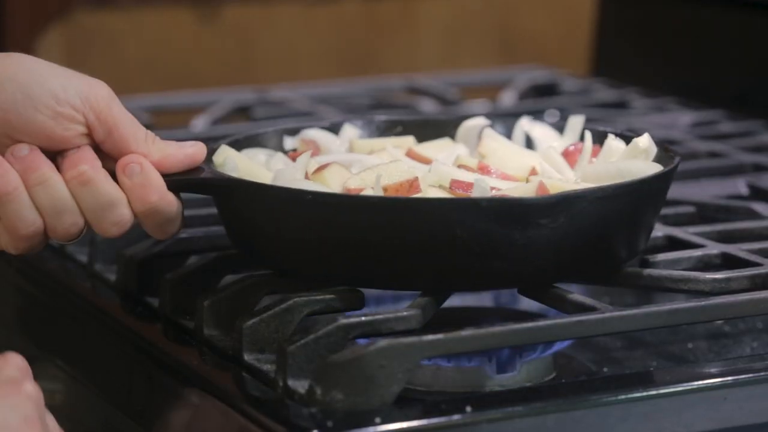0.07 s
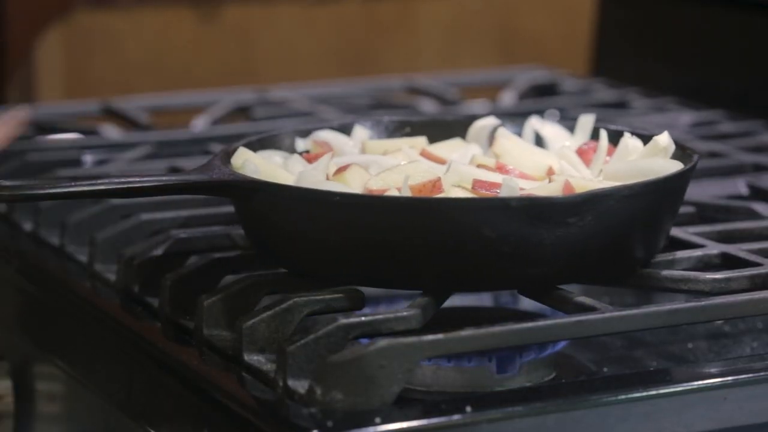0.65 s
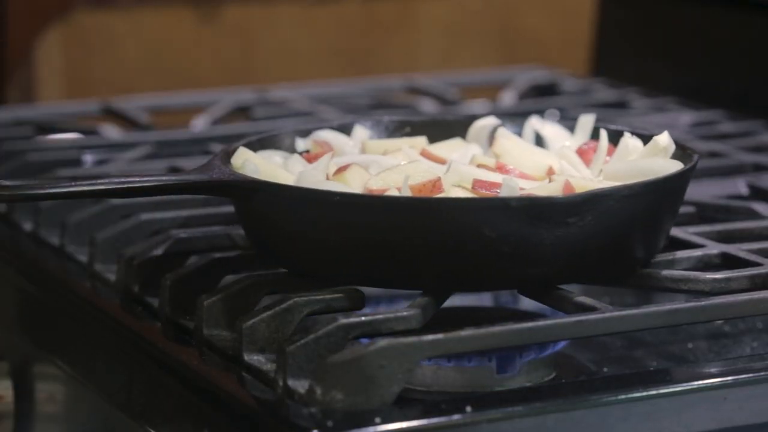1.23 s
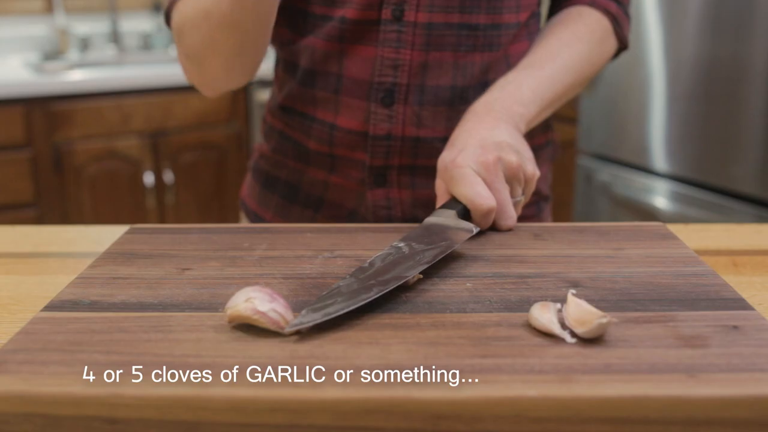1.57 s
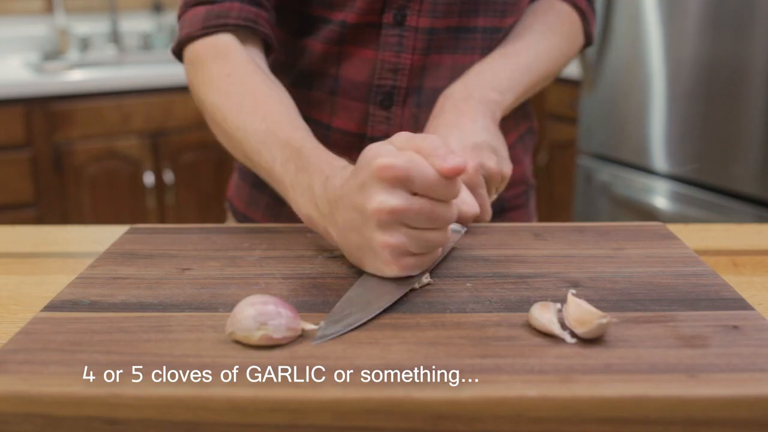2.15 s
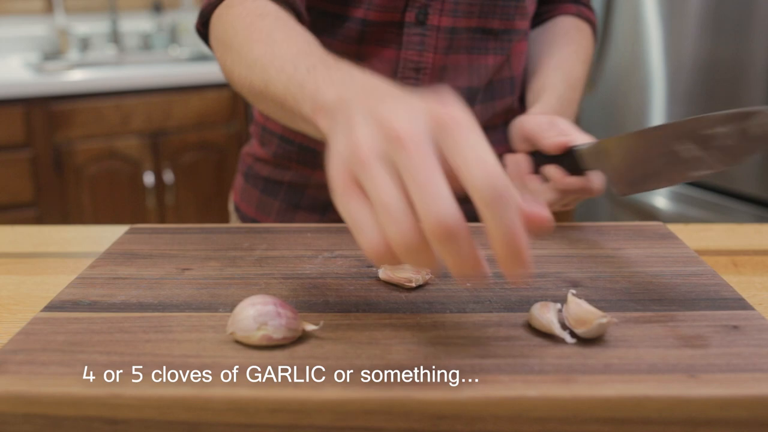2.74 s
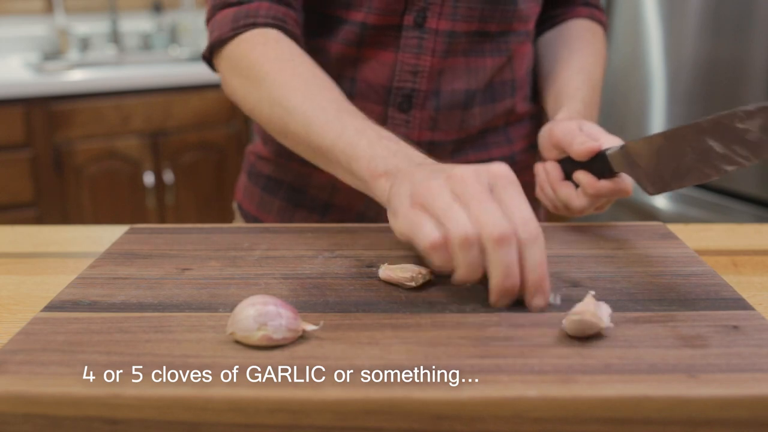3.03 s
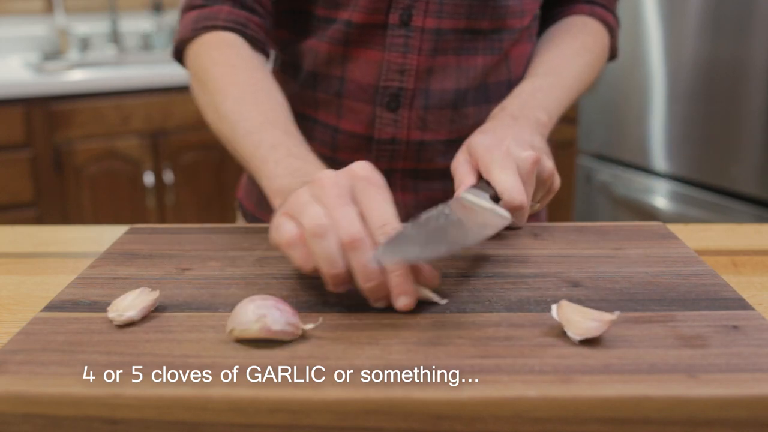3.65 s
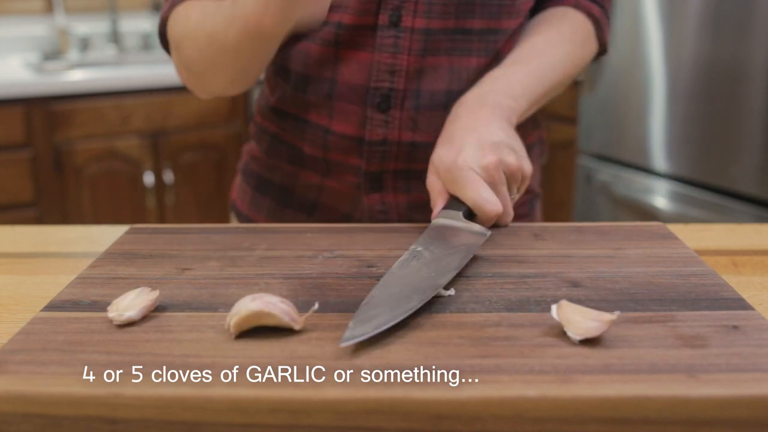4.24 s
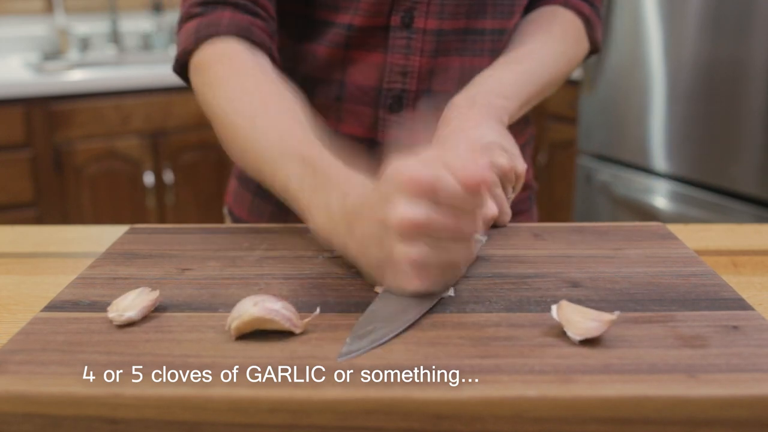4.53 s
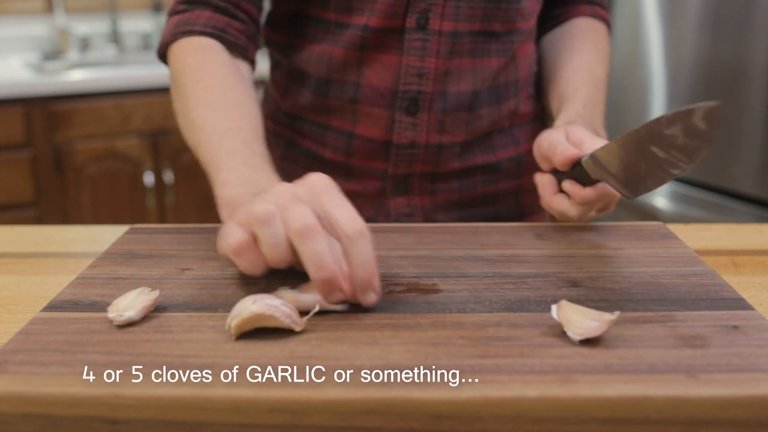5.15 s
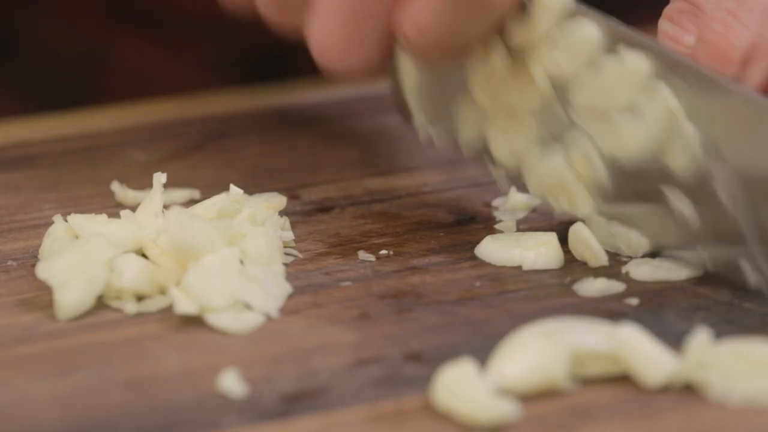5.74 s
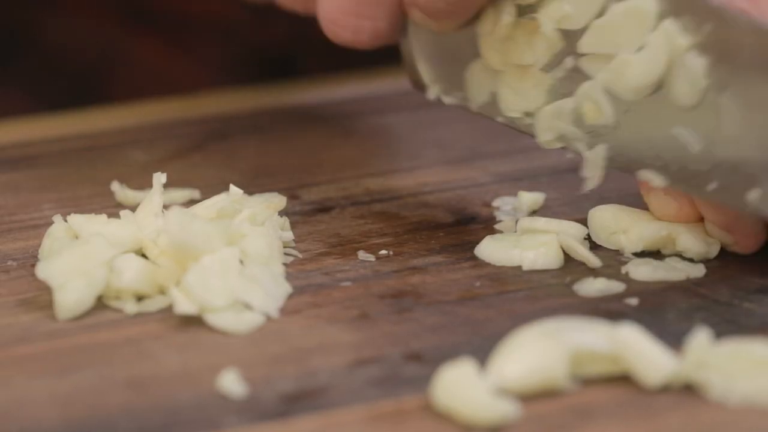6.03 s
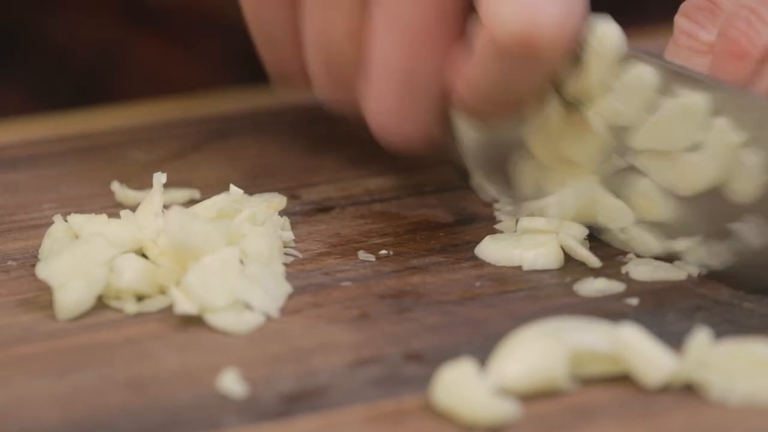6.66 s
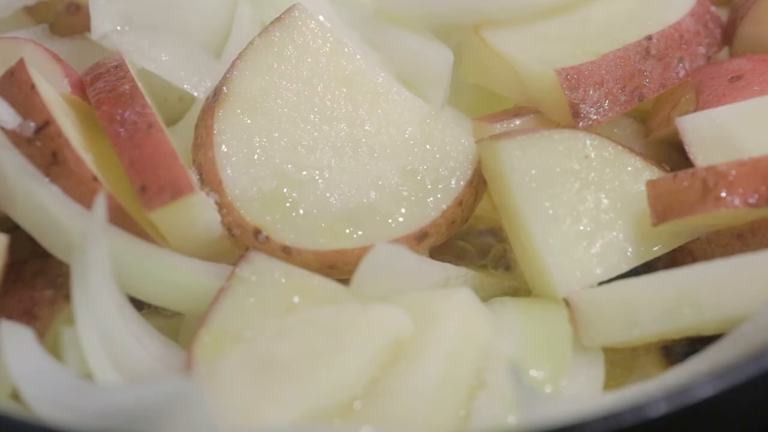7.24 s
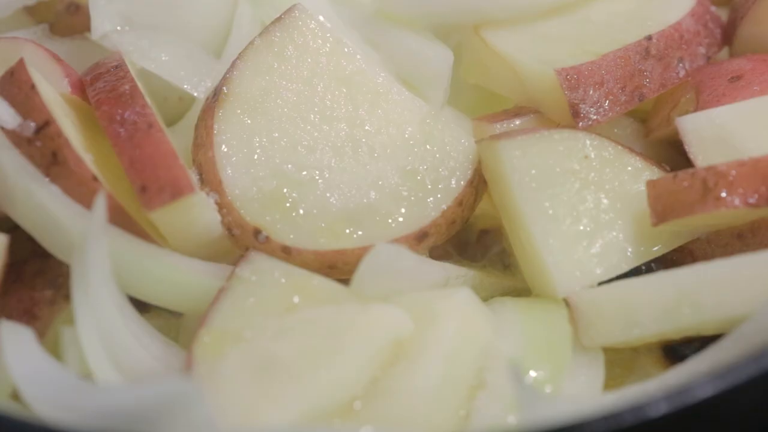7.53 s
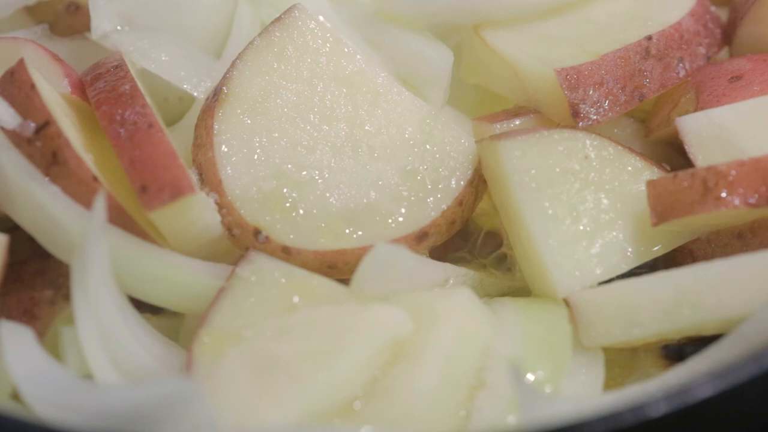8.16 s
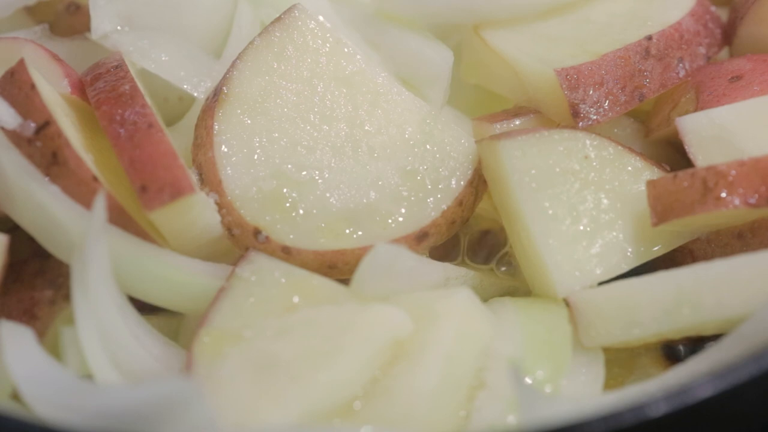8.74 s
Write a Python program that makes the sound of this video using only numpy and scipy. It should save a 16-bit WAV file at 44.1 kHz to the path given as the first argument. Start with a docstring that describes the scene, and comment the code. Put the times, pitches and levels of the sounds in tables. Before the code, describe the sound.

Two loud, cracking garlic smashes on a wooden board and four softer knife cuts, between a brief iron pan scrape and gently popping oil.

```python
"""An iron pan grinds onto a stove grate, catching and slipping, then sizzles faintly across a kitchen.
At the wooden board a fist twice smashes garlic under a knife blade: the clove cracks, the steel rings
and the counter shudders. Papery skins are brushed aside, and the knife slices four times into the wood.
Then the pan is close to the microphone, spitting as steam bubbles burst in the oil.
Mono, in a fairly live room that answers every blow."""
import sys
import numpy as np
from scipy import signal
from scipy.fft import rfft, irfft, next_fast_len
from scipy.io import wavfile

SR = 44100
rng = np.random.default_rng(int(sys.argv[2]) if len(sys.argv) > 2 else 0)


def to_wav(s):
    """Save 16-bit WAV."""
    ch = np.atleast_2d(s).T  # columns
    pcm = np.round(np.clip(ch, -1, 1) * 32767)  # PCM
    wavfile.write(sys.argv[1], SR, pcm.astype(np.int16))


N = 396459
TIME = np.arange(N) / SR

# The wooden board's modes. Each row: pitch in Hz, relative level in dB, t60 in seconds.
BOARD = [(183.5, -12.5, 0.047), (260, -10, 0.062), (305, -47.5, 0.017), (491, -20, 0.041),
         (563, -18, 0.038), (810, -10, 0.022), (963, -13, 0.055), (1087, -27, 0.11), (1415, -44, 0.021),
         (1620, -8, 0.0079), (2010, -29, 0.024), (2760, -9.5, 0.015)]
# The wood is knocked, by a hand or by the knife laid down. Each row: start in seconds, drive in dB, lowest and
# highest pitch driven in Hz.
BUMPS = [(1.485, -32.5, 118, 210), (4.058, -23, 70, 184), (4.477, -34.5, 400, 1200)]
# The fist lands on the blade. Each row: start in seconds, crack in dB, its pitch in Hz, thump in dB,
# clap in dB, top of the steel's slap in Hz, after-ring in dB, its pitch in Hz. Levels are relative.
SMASHES = [(2.185, 0, 2180, -5.5, -12.5, 3020, -2, 2940), (4.629, 1, 4100, -9, -11.5, 3720, -19.5, 1704)]
# The edge goes through a clove into the board. Each row: time in seconds, drive of the knock in dB,
# its highest pitch in Hz, relative level of the juice's hiss in dB.
SLICES = [(5.3995, -22, 1450, -47.5), (5.8635, -15.5, 1500, -46), (6.292, -13.5, 1610, -38.5),
          (6.7278, -18, 1550, -42)]
LAND_S = .0062  # from the fist's first touch until the blade reaches the board


def amp(db):
    """Decibels to gain."""
    return 10 ** (np.asarray(db) / 20)


def unit(x):
    """Scale to an rms of one."""
    return x / np.std(x)


def fader(rows):
    """Gain over time from (s, dB) rows."""
    return amp(np.interp(TIME, *np.transpose(rows)))


def fade_in(s, length_s=.18):
    """Gain rising from nothing to one around a time."""
    return np.clip(.5 + (TIME - s) / length_s, 0, 1)


def stroke(s, db, rise_s, fall_s):
    """Gain of a sliding movement that speeds up to a time and then dies away."""
    return amp(db) * np.exp(-(np.maximum(s - TIME, 0) / rise_s) ** 2 - np.maximum(TIME - s, 0) / fall_s)


def add(track, s, x):
    """Mix a sound into a track at a time."""
    i = max(0, int(s * SR))
    track[i:i + len(x)] += x[:N - i]


def colour(x, points):
    """Give a sound a spectrum of (Hz, dB) points, falling off steeply below the first."""
    hz, db = np.transpose(points)
    size = next_fast_len(len(x))
    f = np.maximum(np.fft.rfftfreq(size, 1 / SR), 1)
    gain = amp(np.interp(np.log(f), np.log(hz), db)) * np.minimum(f / hz[0], 1) ** 2
    return irfft(rfft(x, size) * gain, size)[:len(x)]


def resonate(x, hz, q):
    """One resonance, gain one at its centre."""
    hz = min(hz, .4 * SR)
    return signal.lfilter(*signal.iirpeak(hz, max(q, 3 * hz / SR), fs=SR), x)


def soften(x, hz, order=3):
    """Roll off the treble, as a soft contact does."""
    return signal.sosfilt(signal.butter(order, min(hz, SR / 2 - 1), fs=SR, output="sos"), x)


def clicks(rate, spread_db):
    """Random impulses of uneven size, about `rate` a second."""
    size = amp(spread_db * np.minimum(rng.exponential(size=N), 5))
    return (rng.random(N) < rate / SR) * size * rng.choice([-1, 1], N)


def crackle(rate, spread_db, q, flicker_db):
    """Tiny bursts of every pitch, more of them in the treble; each band's level flickers."""
    out = np.zeros(N)
    for hz in np.geomspace(400, 15000, 14):
        flicker = np.interp(TIME, np.linspace(0, TIME[-1], 200), rng.standard_normal(200))
        impulses = clicks(rate * (hz / 3000) ** .7, spread_db)
        grains = resonate(resonate(impulses, hz, q), hz, q)
        out += np.sqrt(hz) * unit(grains) * amp(flicker_db * flicker)
    return unit(out)


def ring(modes):
    """The free ringing of a body's (Hz, dB, t60) modes."""
    t = TIME[:SR]
    return sum(amp(db - 60 * t / t60) * np.cos(2 * np.pi * hz * t) for hz, db, t60 in modes)


def strike(hits, modes, grain_db=-60):
    """Each blow rings the same modes and a wash of lesser ones; the contact sets the range driven."""
    # The wash of dense lesser modes, as in wood. Each row: frequency in Hz, relative level in dB.
    wood_grain = [(200, 6.5), (400, -3), (650, -0.5), (1300, -0.5), (1800, -19), (3000, -3.5),
                  (6000, -31.5)]
    out, body = np.zeros(N), ring(modes)
    for s, db, low_hz, high_hz in hits:
        wash = amp(grain_db) * unit(colour(rng.standard_normal(SR), wood_grain))
        wash *= np.exp(-TIME[:SR] / .0082)
        contact = signal.butter(2, [low_hz, max(high_hz, 1.05 * low_hz)], "band", fs=SR, output="sos")
        add(out, s, amp(db) * signal.sosfilt(contact, body + wash))
    return out


def bounced(hits, delay_s=.022, drop_db=-2.5):
    """A touch lands twice: each (s, dB, lowest Hz, highest Hz) contact is followed by a weaker one."""
    return hits + [(s + delay_s, db + drop_db, low, high) for s, db, low, high in hits]


def fractures(rows, q, splinter_db):
    """Sudden breaks (s, dB, decay s, Hz): a dying rush through one resonance, with bright splinters."""
    t, out = TIME[:SR // 10], np.zeros(N)
    for s, db, decay, hz in rows:
        fade = np.exp(-t / decay)
        rush = rng.standard_normal(len(t)) * fade
        splinters = unit(rush - soften(rush, 1100, order=1))
        crack = unit(resonate(rush, hz, q)) + amp(splinter_db) * splinters
        add(out, s, .5 * amp(db) * unit(crack) * np.std(fade))
    return out


def pan_on_grate():
    """Rough iron catches and slips; the little impacts ring the pan, which then knocks into place."""
    # Pushes over the grate. Each row: start in seconds, relative level in dB, length in seconds,
    # treble roll-off in Hz.
    shoves = [(0.0, -26, 0.021, 3500), (0.018, -30, 0.094, 2900), (0.112, -30, 0.02, 9000),
              (0.13, -34.5, 0.065, 4000), (0.451, -42, 0.069, 2600)]
    # Cast iron, damped by the food. Each row: pitch in Hz, relative level in dB, t60 in seconds.
    iron = [(769, -15, 0.28), (1030, -16, 0.26), (1200, -8.5, 0.13), (1367, -13, 0.068),
            (1534, -15.5, 0.088), (1610, -21.5, 0.071), (1952, -12, 0.075), (2500, -4, 0.089),
            (2930, -2, 0.092), (3640, -8.5, 0.034), (5940, -9, 0.14)]
    # The tone of the grinding. Each row: frequency in Hz, relative level in dB.
    grind = [(41, -22), (70, -1), (210, -7.5), (322, -3.5), (632, -7.5), (1130, -2), (1660, -6.5),
             (1940, -1), (3730, -9), (4770, -12.5), (15000, -34.5)]
    # The pan settles. Each row: start in seconds, drive in dB, lowest and highest pitch driven in Hz.
    pan_knocks = [(.026, -18.5, 690, 1370), (.115, -12, 1840, 2090), (.1165, -17.5, 3380, 4030),
                  (.461, -19, 1534, 1700), (.471, -15, 1466, 1670), (.487, -27, 1480, 1740)]
    out = np.zeros(N)
    grit = clicks(rate=2500, spread_db=-.5)[:SR]
    ringing = unit(signal.fftconvolve(grit, ring(iron))[:SR])
    scrape = unit(unit(colour(grit, grind)) + amp(-10.5) * ringing)
    for s, db, length, hz in shoves:
        age = np.maximum(TIME[:SR] - s, 0) / length
        push = np.minimum(age / .041, 1) * np.exp(-age ** 2)
        add(out, 0, amp(db) * soften(scrape * push, hz, order=1))
    return out + strike(pan_knocks, iron)


def kitchen(x):
    """Diffuse reflections reach the microphone after a short gap and die faster in the treble."""
    # The room's reverberation. Each row: band centre in Hz, t60 in seconds, relative level in dB.
    room = [(60, 0.79, 5), (152, 0.6, -6), (276, 0.68, -1), (594, 0.83, 1), (1150, 0.8, -1),
            (2050, 0.94, -8), (3980, 0.74, -10.5), (7500, 0.52, -14.5), (13900, .38, -24.5)]
    t, tail = TIME[:int(1.5 * SR)], 0
    noise = rfft(rng.standard_normal(len(t)))
    pitch = np.log(np.maximum(np.fft.rfftfreq(len(t), 1 / SR), 1))
    centres = np.log([row[0] for row in room])
    for band, (_, t60, db) in zip(np.eye(len(room)), room):
        fade = np.clip((t - .005) / .00252, 0, 1) * np.exp(-np.log(1000) * t / t60)
        reflections = irfft(noise * np.interp(pitch, centres, band), len(t))
        tail = tail + amp(db) * reflections * fade / np.linalg.norm(fade)
    return signal.fftconvolve(x, tail)[:N]


def bubbles(rows):
    """Bubbles burst (s, dB, Hz): the film snaps, the cavity rings about a millisecond, longer if low."""
    t, out = TIME[:SR // 100], np.zeros(N)
    snap = soften(amp(-2.5) * np.exp(-t / .00034) * np.cos(2 * np.pi * 2600 * t), 7000)
    for s, db, hz in rows:
        age = t / (.00025 * (3500 / hz) ** .32)
        cavity = age * np.exp(1 - age) * np.sin(2 * np.pi * hz * t)
        add(out, s, amp(db) * (cavity + snap))
    return out


def frying():
    """Steam bubbles burst in the oil: a blurred hiss from afar, separate pops from close by."""
    # The sizzle's tone from afar and from close by. Each row: frequency in Hz, relative level in dB.
    far_colour = [(250, -12.5), (450, -10.5), (650, -6.5), (1000, -4), (2000, -4), (3500, -5.5),
                  (5000, -12.5), (7000, -17), (10000, -25), (15500, -47)]
    near_colour = [(150, -3), (280, 0.5), (600, -4.5), (900, 7), (1400, 4), (2200, 6.5), (3600, 7.5),
                   (5400, -0.5), (7500, -2), (11000, -7), (15500, -7)]
    # The sizzle heard from the board and at the pan. Each row: time in seconds, relative level in dB.
    distant = [(2, -50.5), (5.2, -51), (5.7, -54), (6.7, -54)]
    close = [(6.92, -44), (7.02, -41), (8.69, -40.5), (8.97, -35)]
    # The loudest bubbles. Each row: start in seconds, relative level in dB, pitch in Hz.
    loud_pops = [(0.909, -33, 2480), (0.97, -32, 4430), (1.481, -30.5, 1650), (6.898, -20.5, 4000),
                 (7.031, -17, 7550), (7.145, -17.5, 4000), (7.401, -22, 3800), (7.455, -21.5, 3900),
                 (7.507, -21.5, 3430), (7.649, -19.5, 3680), (7.753, -27, 3280), (7.84, -20.5, 1060),
                 (7.95, -24, 3550), (8.004, -22, 1350), (8.337, -20.5, 1070), (8.46, -16, 6800),
                 (8.569, -24, 3010), (8.738, -26.5, 3010), (8.898, -15.5, 1480)]
    leave_stove_s, back_at_pan_s = 1.834, 6.86
    cold_db, warming_db_per_s = -59.5, 7  # the sizzle grows as the pan heats
    away = fade_in(leave_stove_s)
    warming = amp(cold_db + warming_db_per_s * np.minimum(TIME, leave_stove_s)) * (1 - away)
    near_gain = amp(-.5) * warming + fader(close) * fade_in(back_at_pan_s)
    far_gain = warming + fader(distant) * away
    hiss = unit(colour(crackle(rate=900, spread_db=.5, q=1, flicker_db=4.5), far_colour))
    fizz = unit(colour(crackle(rate=700, spread_db=3.5, q=1.32, flicker_db=2.8), near_colour))
    # larger bubbles burst at random, most of them weak
    when, size, pitch = rng.random((600, 3)).T
    spatter = bubbles(zip(when * TIME[-1], 11 * size ** 2, 1100 * 7 ** pitch))
    # a big, low bubble throws a droplet, which bursts in turn
    droplets = [(s + .00154, db - 3.5, hz * 2.26) for s, db, hz in loud_pops if hz < 1700]
    pops = amp(-1) * bubbles(loud_pops + droplets) + amp(2) * spatter * near_gain
    pops -= soften(pops, 320, order=1)  # a small bubble radiates no bass
    return hiss * far_gain + amp(-1) * fizz * near_gain + pops + amp(-7.5) * kitchen(pops)


def garlic_and_board():
    """The board is knocked now and then; in a smash the clove cracks, the blade claps down and the fist
    rebounds."""
    # The clove gives way in stages. Each row: delay in seconds, level against the crack's in dB,
    # decay in seconds, pitch as a multiple of the crack's.
    crush = [(0, -11, 0.0019, 2.2), (.0029, -1.5, 0.0013, .9), (.0043, 2, 0.0015, 1.2),
             (.006, -7, .0016, .85), (0.0184, -18, 0.0029, 1.6)]
    fist_hz, flat_steel_hz, rebound_hz = (85, 330), (447, 1220), (130, 660)  # ranges driven in the wood
    cracks, thumps = [], bounced(BUMPS)
    for s, crack_db, crack_hz, thump_db, clap_db, *_ in SMASHES:
        for delay, db, decay, ratio in crush:
            cracks.append((s + delay, crack_db + db, decay, crack_hz * ratio))
        thumps += [(s + LAND_S, thump_db, *fist_hz),
                   (s + LAND_S, clap_db, *flat_steel_hz),
                   (s + .024, -13, *rebound_hz)]
    return fractures(cracks, q=.62, splinter_db=0) + strike(thumps, BOARD, grain_db=-9.5)


def counter():
    """The counter under the board shudders on after each smash, slice and bump."""
    # Its deep shaking. Each row: frequency in Hz, relative level in dB.
    shudder = [(28, 10.5), (42, 7.5), (58, 4), (75, -15), (110, -25), (200, -44)]
    out, t = np.zeros(N), TIME[:2 * SR]
    swell = np.minimum(t / .008, 1) * np.exp(-t / .2)
    blows = [(s + LAND_S, -36) for s, *_ in SMASHES]
    blows += [(s, -58.5) for s, *_ in SLICES]
    blows += [(s, db - 34.5) for s, db, *_ in BUMPS]
    for s, db in blows:
        add(out, s, amp(db) * unit(colour(rng.standard_normal(len(t)), shudder)) * swell)
    return out


def steel():
    """The blade slaps down under the fist and its free part rings on; light taps fall in between."""
    # Steel, mostly choked by the hand. Each row: pitch in Hz, relative level in dB, t60 in seconds.
    blade = [(1014, -18, 0.037), (1064, -6.5, 0.03), (1406, -12.5, 0.031), (1432, -31.5, 0.82),
             (1570, -26.5, 0.014), (1920, -36, 0.94), (2540, -6.5, 0.015), (2740, -39, 0.98),
             (3084, -36.5, 0.81), (3650, -5.5, 0.015), (4010, -10, 0.042), (4070, -33, 0.7)]
    # The blade is laid on a clove or touches the board. Each row: start in seconds, drive in dB,
    # lowest and highest pitch driven in Hz.
    blade_taps = [(3.85, -29, 3310, 3750), (4.059, -22, 1070, 1580)]
    slap_db, slap_low_hz, ring_spread = -5, 900, 1.054
    hits = bounced(blade_taps)
    for s, *_, top_hz, ring_db, ring_hz in SMASHES:
        hits += [(s + LAND_S, slap_db, slap_low_hz, top_hz),
                 (s + .0095, ring_db, ring_hz / ring_spread, ring_hz * ring_spread)]
    return strike(hits, blade)


def skins():
    """Papery skins crinkle with each sweep of the hand, and now and then one snaps."""
    # The tone of dry garlic skin. Each row: frequency in Hz, relative level in dB.
    paper = [(1760, -34), (3000, -10), (3910, -3), (5630, -8.5), (7400, -0.5), (10400, -6.5), (12900, -7),
             (14800, -3.5), (16000, -14)]
    # The hand sweeps the wood. Each row: fastest moment in seconds, relative level in dB,
    # rise and fall in seconds.
    sweeps = [(2.59, -55.5, 0.03, 0.038), (2.96, -57, 0.025, .05), (3.05, -35, .024, 0.07),
              (3.15, -40.5, 0.023, 0.037), (3.195, -42, 0.022, 0.018), (3.28, -41.5, 0.027, 0.16),
              (3.67, -46, 0.047, 0.073), (3.765, -58.5, 0.041, .025), (5.15, -47, .03, .075)]
    # A skin snaps. Each row: start in seconds, relative level in dB, pitch in Hz.
    snaps = [(2.59, -35, 7200), (2.948, -44, 12000), (3.003, -27, 9000), (3.245, -25, 5750),
             (3.248, -20.5, 7650), (3.672, -30, 7730), (3.748, -47, 13000)]
    crinkle = unit(colour(crackle(rate=220, spread_db=2, q=.94, flicker_db=1.5), paper))
    rustle = amp(-.5) * crinkle * sum(stroke(*row) for row in sweeps)
    return rustle + fractures([(s, db, .002, hz) for s, db, hz in snaps], q=7, splinter_db=-10)


def slicing():
    """Each slice crunches wetly, knocks on the board and rubs on the way up; some end in a heel knock."""
    # Wet steel rubbing on garlic. Each row: frequency in Hz, relative level in dB.
    wet_steel = [(1500, -16), (2600, -6), (3900, 4), (5200, -17), (13000, -21)]
    # The knife's heel rocks down. Each row: start in seconds, drive in dB, highest pitch driven in Hz.
    heel_rocks = [(5.467, -18, 440), (6.768, -12.5, 470)]
    lead_s, edge_low_hz, heel_low_hz = .01, 209, 222
    wet, lift = [], 0
    for s, _, _, db in SLICES:
        wet += [(s - lead_s, db + 4, .013, 2900),  # the flesh parts
                (s - lead_s, db, .043, 12000)]  # the juice hisses
        lift = lift + stroke(s + .18, db=-57.5, rise_s=.033, fall_s=.063)
    rub = unit(colour(clicks(rate=1600, spread_db=.5), wet_steel)) * lift
    tips = [(s, db, edge_low_hz, hz) for s, db, hz, _ in SLICES]
    heels = [(s, db, heel_low_hz, hz) for s, db, hz in heel_rocks]
    knocks = bounced(tips, delay_s=.0107, drop_db=-5.5)  # the rest of the edge lands just after the tip
    knocks += bounced(heels, delay_s=.036, drop_db=-3.5)
    return fractures(wet, q=.64, splinter_db=-5) + rub + strike(knocks, BOARD, grain_db=-12)


def scene():
    """Board, stove and the room's low rumble at one microphone."""
    # The kitchen's room tone. Each row: frequency in Hz, relative level in dB.
    room_tone = [(15, -12.5), (35, -5.5), (70, -1), (160, -2.5), (300, -1), (600, -22.5)]
    blade, chops = steel(), slicing()
    pan, paper = pan_on_grate(), skins()
    rumble = amp(-66) * unit(colour(rng.standard_normal(N), room_tone))
    # a smash sounds different in every direction, so each wall returns its own version
    walls = sum(kitchen(garlic_and_board()) for _ in range(5))
    into_room = amp(-5) * blade + amp(-6.5) * chops + amp(-6) * pan + amp(2) * paper
    echo = amp(-6.5) * walls + kitchen(into_room)
    return (garlic_and_board() + blade + counter() + chops + pan + paper + frying() + rumble + echo)[None]


def record(dry):
    """The recorder clips at full scale and cuts the treble above 15.9 kHz."""
    top_cut = signal.ellip(10, .1, 80, 15900, fs=SR, output="sos")
    return signal.sosfilt(top_cut, np.clip(dry, -1, 1))


dry = scene()
out = record(dry)
to_wav(out)
```